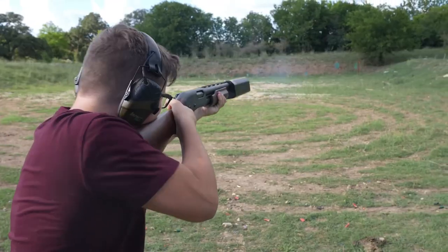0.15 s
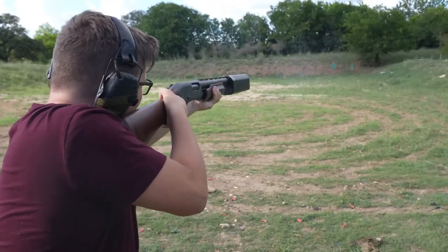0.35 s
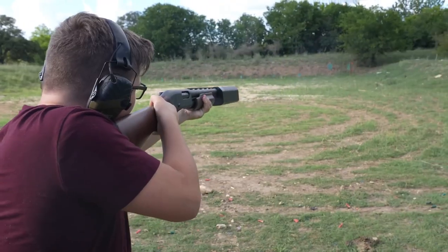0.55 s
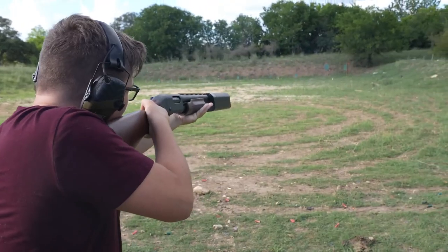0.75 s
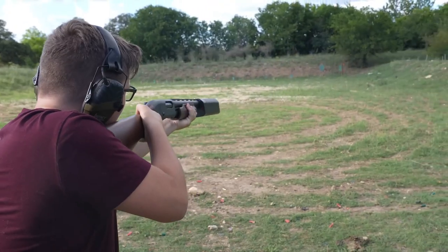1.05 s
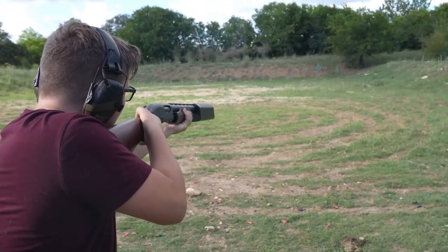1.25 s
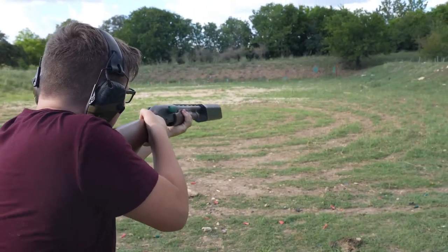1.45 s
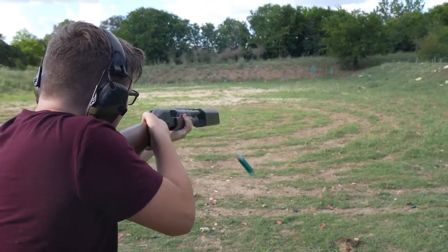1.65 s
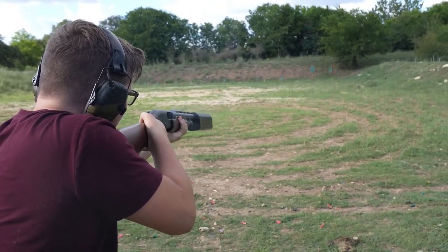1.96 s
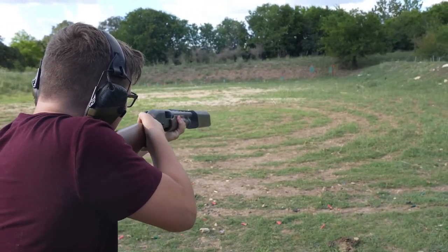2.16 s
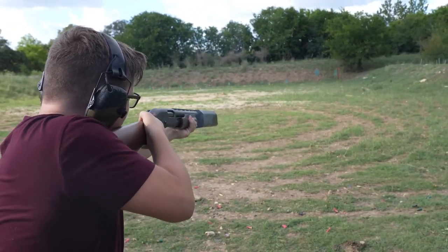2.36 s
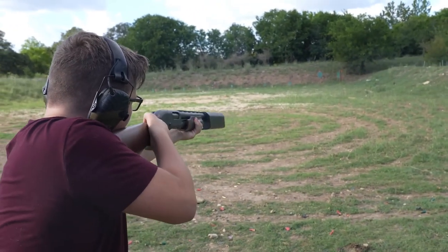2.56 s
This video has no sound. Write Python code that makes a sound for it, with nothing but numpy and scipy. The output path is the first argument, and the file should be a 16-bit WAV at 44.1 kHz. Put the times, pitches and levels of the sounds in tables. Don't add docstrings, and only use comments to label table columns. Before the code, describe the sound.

A muffled shotgun fires once outdoors, its crack slapping back from a bank and trees; then the pump clacks back, the shell rattles out, and the pump slams home, close in stereo over faint insects and light wind.

```python
import sys
import numpy as np
from scipy import signal
from scipy.fft import rfft, irfft, next_fast_len
from scipy.io import wavfile
from scipy.ndimage import uniform_filter1d, map_coordinates

SR = 44100
rng = np.random.default_rng(int(sys.argv[2]) if len(sys.argv) > 2 else 0)


def materialize(psi):
    bounded = np.clip(np.atleast_2d(psi).T, -1, 1)
    quanta = np.round(bounded * 32767).astype(np.int16)
    wavfile.write(sys.argv[1], SR, quanta)


def level_to_linear(level):
    exponent = np.asarray(level, float) / 20
    return 10 ** exponent


N = 119070


def unit(x):
    return x / np.sqrt(np.mean(x ** 2) + 1e-20)


def steady(x, span_s):
    power = (x ** 2).reshape(-1, N).mean(axis=0)
    return x / np.sqrt(abs(uniform_filter1d(power, size=round(span_s * SR))) + .02)


def along(points, hz):
    f, v = np.transpose(points)
    return np.interp(np.log(hz + 1), np.log(f + 1), v)


def wobble(rate):
    knots = rng.standard_normal(int(N * rate / SR) + 4)
    return map_coordinates(knots, [np.arange(N) * rate / SR])


def filtered(x, response):
    m = next_fast_len(x.shape[-1] + 4096)
    return irfft(rfft(x, m) * response(np.fft.rfftfreq(m, 1 / SR)), m)[..., :x.shape[-1]]


def pair(alike, size, lag_s=0):
    def share(hz):
        turn = np.arccos(np.clip(along(alike, hz), -1, 1)) / 2
        return np.array([np.cos(turn), np.sin(turn)])

    def lag(hz):
        return np.exp(-1j * np.pi * hz * lag_s * np.array([[1], [-1]]))

    mid, side = filtered(rng.standard_normal((2, size)), share)
    return filtered(np.array([mid + side, mid - side]), lag)


def peak(hz, centre_hz, wide_hz):
    return 1j * hz * wide_hz / (centre_hz ** 2 - hz ** 2 + 1j * hz * wide_hz)


def resonant(hz, peaks):
    return 1 + sum((-1) ** k * level_to_linear(db) * peak(hz, c, w) for k, (c, w, db) in enumerate(peaks))


# pitch_hz, share (0 to 1)
PAN = [(250, 0), (500, 0.1), (1200, 0.78), (4000, 0.16), (9000, 0.95)]


def lean(x, pan_db):
    return filtered(x, lambda hz: level_to_linear(pan_db * along(PAN, hz) * np.array([[.5], [-.5]])))


# pitch_hz, level_db (per Hz)
ACTION = [(150, -22.5), (300, -11.5), (500, -11.5), (800, -8.5), (2000, -3), (5000, -2), (15600, -7),
          (16300, -52)]


def clicks(rows, body, broad_db=0, ring_db=9):
    rise_s, ring_q, broad_q, level_db = 0.0006, 12, .33, -1.5
    out, t = np.zeros((2, N + 4096)), np.arange(3000) / SR
    for s, db, hz, t60 in rows:
        decay = (1 - np.exp(-t / rise_s)) * level_to_linear(-60 * t / max(t60, .003))
        burr = pair([(500, 1.0), (2500, 0.67)], size=len(t)) * decay
        burr[:, round(rise_s * SR)] += 1.1
        stock_db = -6 + .5 * (db + 11.0)

        def struck(f):
            wide = peak(f, hz, hz / broad_q) ** 2 + level_to_linear(stock_db) * resonant(f, body)
            narrow = peak(f, hz, hz / ring_q)
            return level_to_linear(along(ACTION, f)) * (level_to_linear(broad_db) * wide + level_to_linear(ring_db) * narrow)

        ring = filtered(burr, struck)
        loudest = abs(ring.mean(axis=0)).max() * np.sqrt(2)
        out[:, round(s * SR):][:, :len(t)] += level_to_linear(db + level_db) * ring / loudest
    return out[:, :N]


# pitch_hz, level_db (per Hz)
AIR = [(180, -9), (400, -35), (1500, -18), (2300, -6), (8900, -12), (11700, -13.5), (12300, -53)]


def air():
    def colour(hz):
        return level_to_linear(along(AIR, hz)) * (abs(hz - 10580) > 840)

    return level_to_linear(-67) * unit(filtered(pair([(400, 0.16), (2000, 0.022)], size=N), colour))


def insects():
    song = filtered(pair([(1000, 0.17)], size=N), lambda hz: np.exp(-.5 * ((hz - 10580) / 420) ** 2))
    return level_to_linear(-63.5 + 1.8 * wobble(39.9)) * unit(song)


# pitch_hz, level_db (per Hz)
RUMBLE = [(20, -8), (50, 7.5), (100, -1.5), (200, -26), (400, -24), (800, -73)]
# middle_s, level_db (over the steady wind), spread_s
GUSTS = [(.05, -4.5, 0.098), (0.171, 10, 0.035), (.4, 9, 0.078), (.75, 6, 0.018), (.9, 7, 0.042),
         (1.11, 7.5, 0.025), (1.21, 10, 0.013), (1.7, -16, 0.048), (1.902, 8.5, 0.023), (2.039, 2, 0.018),
         (2.112, 13, 0.0096), (2.178, 13, 0.027), (2.619, 10, 0.02)]


def wind():
    t, wind_db = np.arange(N) / SR, -65.5
    swell_db = sum(db * np.exp(-.5 * ((t - s) / spread) ** 2) for s, db, spread in GUSTS)
    rumble = level_to_linear(2.5 * wobble(40)) * pair([(60, .96)], size=N)
    rumble = steady(unit(filtered(rumble, lambda hz: level_to_linear(along(RUMBLE, hz)))), .05)
    flutter = level_to_linear(4 * wobble(50)) * rng.standard_normal(N)
    flutter = steady(unit(filtered(flutter, lambda hz: peak(hz, 158, 316) ** 4)), .06)
    return level_to_linear(wind_db + swell_db) * (rumble + level_to_linear(-16.5 + 0.46 * swell_db) * flutter)


# middle_s, level_db, spread_s,
# centre_hz, left_over_right_db
ECHOES = [(0.227, -30.5, 0.0047, 270, -2), (0.231, -31, 0.0024, 11000, -25),
          (.258, -28.5, 0.018, 11100, -8), (0.294, -34.5, 0.015, 640, 1), (.29, -30.5, 0.019, 9700, 17.5),
          (0.324, -22.5, 0.0099, 6560, -10), (0.349, -32, 0.043, 290, -17.5),
          (0.382, -26.5, 0.044, 4300, 0), (0.459, -28, 0.039, 1960, -19.5), (.52, -37, 0.039, 258, -2),
          (.655, -45.5, 0.03, 260, -6), (0.556, -32.5, 0.007, 1130, -3), (0.612, -33, 0.01, 6500, -6),
          (0.637, -32, 0.024, 1130, -4), (0.673, -34, 0.015, 1430, -8), (0.76, -38.5, 0.022, 1380, -4.5),
          (0.878, -49.5, 0.025, 1160, 0), (1.008, -51, 0.014, 880, -4), (1.679, -60, 0.1, 490, -5),
          (1.8, -68, 0.1, 970, -6)]
# pitch_hz, fall_s
TAIL = [(250, .55), (480, 1.3), (900, 2.76), (2500, 1.69), (6000, 1.47), (12000, 0.77), (15000, 1)]
# pitch_hz, level_db (per Hz)
BLAST = [(100, -19), (250, -5), (480, -17.5), (700, -12), (2600, 6.5), (10400, 2.5), (15600, -5.5),
         (16200, -46)]
# pitch_hz, width_hz, level_db
MUFFLER = [(705, 91, 13), (1380, 240, 4.5), (1830, 480, -11.5)]
# pitch_hz, likeness (0 to 1)
ECHO_ALIKE = [(300, 1), (700, 0.92), (1500, 0.89), (3000, 0.31), (8000, 0.034)]


def echoes():
    shot_s, tail_db, rise_s, octaves, skirt_db = SHOT[0][0], -22.5, 0.25, 0.92, -17.5
    valley_db, valley_t60, valley_hz = -61, 6.7, 810
    noise = level_to_linear(0.41 * wobble(150)) * pair(ECHO_ALIKE, size=N, lag_s=0.00011)
    hz, t, z = signal.stft(noise, SR, nperseg=512, noverlap=448)
    hz = hz[:, None]
    since = np.clip(t - shot_s, 0, None)
    colour = abs(level_to_linear(along(BLAST, hz)) * resonant(hz + 1, MUFFLER)) ** 2

    def side(pan_db):
        return level_to_linear(pan_db * along(PAN, hz) * np.array([1, -1])[:, None, None])

    def near_pitch(centre_hz, width):
        return np.exp(-(np.log2((hz + 1) / centre_hz) / width) ** 2)

    fall = (1 - np.exp(-since / rise_s)) * level_to_linear(-120 * since / along(TAIL, hz))
    power = level_to_linear(2 * tail_db) * colour / colour.mean() * fall
    valley = level_to_linear(2 * valley_db - 120 * since / valley_t60) * 20 * near_pitch(valley_hz, 0.34)
    power = (power + valley * (since > 0)) * side(-6)
    for s, db, spread, centre_hz, pan_db in ECHOES:
        tint = colour * (near_pitch(centre_hz, octaves) + level_to_linear(2 * skirt_db))
        swell = np.exp(-.5 * ((t - s) / spread) ** 2) * (since > 0)
        power += side(pan_db) * level_to_linear(2 * db) * tint / tint.mean() * swell
    patches = uniform_filter1d(rng.standard_normal(power.shape[1:]), size=5, axis=0)
    patches = unit(uniform_filter1d(patches, size=12, axis=1))
    roar = signal.istft(z * np.sqrt(power) * level_to_linear(2 * patches), SR, nperseg=512, noverlap=448)[1][:, :N]
    return roar * (np.arange(N) > shot_s * SR)


# start_s, level_db (peak), pitch_hz, fall_s (to -60 dB)
BANK = [
    (.409, -28, 2570, .03),
    (.431, -25, 2140, 0.035),
    (.445, -16, 1660, 0.029),
    (.453, -22.5, 688, 0.046),
    (.462, -20, 2160, .03),
    (.475, -18, 1580, 0.025),
    (.483, -21, 2680, .03),
    (.5132, -31.5, 2270, 0.019),
]
# start_s, level_db (peak), pitch_hz, fall_s (to -60 dB)
TREES = [
    (.286, -25.5, 743, 0.063),
    (.551, -17.5, 1170, 0.028),
    (.612, -19.5, 1140, 0.017),
    (.625, -18, 805, 0.023),
    (.634, -16.5, 1200, 0.045),
    (.651, -24, 870, 0.023),
    (.687, -41, 1120, 0.05),
    (.747, -32, 2060, 0.045),
    (.768, -31, 1130, 0.036),
]


def faces():
    bank, trees = clicks(BANK, [], broad_db=-18), clicks(TREES, [], broad_db=-18)
    return lean(bank, -26) + lean(trees, -9)


# start_s, level_db
TUBE = [
    (1.57, -56),
    (2.478, -52),
]


def tube():
    t, pitch_hz, t60 = np.arange(N) / SR, 895, .19
    return sum((t > s) * level_to_linear(db - 60 * abs(t - s) / t60) * np.sin(2 * np.pi * pitch_hz * (t - s))
               for s, db in TUBE)


# start_s, end_s, level_db
SLIDES = [
    (1.483, 1.526, -44),
    (1.56, 1.61, -40),
    (1.614, 1.657, -50),
    (1.78, 1.83, -58.5),
    (2.31, 2.395, -41.5),
    (2.402, 2.469, -39.5),
]


def slides():
    t, edge_s = np.arange(N) / SR, .012
    stroke = sum(level_to_linear(db) * np.clip(np.minimum(t - a, b - t) / edge_s + .5, 0, 1) ** 2 for a, b, db in SLIDES)
    grit = level_to_linear(3.5 * wobble(500)) * pair([(500, .97), (2500, .7)], size=N)
    return stroke * unit(filtered(grit, lambda hz: level_to_linear(along(ACTION, hz))))


def space(x):
    t = np.arange(SR) / SR
    near = level_to_linear(-60 * t / .1) * rng.standard_normal((2, len(t)))
    far = (t > .07) * level_to_linear(-60 * t / .8) * rng.standard_normal((2, len(t)))
    far = filtered(far, lambda hz: peak(hz, 6500, 13000) / (1 + (hz / 13000) ** 10))
    low = level_to_linear(-60 * t / .4) * pair([(500, 1.0)], size=len(t))
    low = filtered(low, lambda hz: peak(hz, 800, 800) ** 2)
    tail = sum(level_to_linear(db) * part / np.linalg.norm(part[0]) for db, part in [(-12, near), (-26, far), (-32, low)])
    return signal.fftconvolve(x, tail, axes=1)[:, :N]


# start_s, level_db (peak), pitch_hz
TICKS = [(0.8496, -32, 2700), (0.9651, -25, 4560), (0.9765, -24.5, 4200), (1.0331, -37, 6400),
         (1.1462, -37.5, 2660), (1.1741, -29, 6500), (1.1779, -31.5, 2920), (1.1966, -39, 5830),
         (1.3708, -40, 3430), (1.4328, -35, 2560), (1.622, -35, 4000), (1.6365, -29, 4570),
         (1.6437, -25.5, 3560), (1.6964, -24.5, 7050), (1.715, -30.5, 5340), (1.7722, -37, 3800),
         (1.775, -27, 5250), (1.81, -37, 5550), (1.8283, -35, 4580), (2.126, -38, 9500)]
# start_s, level_db (peak), pitch_hz, fall_s (to -60 dB)
BACK = [(1.4694, -25.5, 1810, 0.03), (1.476, -22.5, 4040, 0.046), (1.4803, -25, 7500, 0.015),
        (1.4854, -21, 10700, 0.0096), (1.5, -19.5, 2740, 0.025), (1.5062, -28, 3800, 0.11),
        (1.5168, -28.5, 10300, 0.017), (1.5239, -15.5, 1880, 0.063), (1.5281, -10.5, 4530, 0.04),
        (1.5334, -10.5, 14800, 0.043), (1.5431, -8, 2670, 0.013), (1.5443, -8, 3980, 0.0098),
        (1.549, -7.5, 4400, 0.058), (1.554, -17.5, 4080, 0.09), (1.5608, -6.5, 6160, 0.011),
        (1.5654, -13, 4280, 0.014), (1.5698, -4.5, 5600, 0.013), (1.5745, -26, 4200, 0.053),
        (1.589, -20.5, 4240, 0.016), (1.5965, -28.5, 1840, 0.029)]
# start_s, level_db (peak), pitch_hz, fall_s (to -60 dB)
HOME = [(2.2563, -29.5, 3500, 0.016), (2.2764, -22.5, 4770, 0.046), (2.2837, -20, 4760, 0.041),
        (2.2974, -18.5, 5770, 0.032), (2.3162, -14, 4800, 0.075), (2.3226, -14, 4700, 0.025),
        (2.335, -16, 8500, 0.0068), (2.3436, -13, 5330, 0.013), (2.3459, -16.5, 5550, 0.02),
        (2.3634, -18.5, 2560, 0.023), (2.3689, -14, 1880, 0.045), (2.3795, -17, 7500, 0.012),
        (2.389, -12.5, 1950, 0.036), (2.4034, -18.5, 2120, 0.043), (2.4127, -6, 9000, .02),
        (2.4142, -6, 3020, 0.013), (2.4178, -8.5, 2390, 0.021), (2.424, -4.5, 5680, 0.023),
        (2.4295, -18, 4700, 0.025), (2.4445, -29, 6260, 0.022)]
# start_s, level_db (peak), pitch_hz, fall_s (to -60 dB)
KNOCKS = [(1.4586, -31, 2570, .015), (.9655, -27, 4500, .03), (1.1745, -40, 1500, .02),
          (1.5005, -30, 850, .03), (1.5435, -19, 1100, .04), (1.5625, -21, 1150, .04),
          (2.413, -17, 1450, .03), (1.6362, -30, 2200, .012), (1.6437, -28, 2250, .012),
          (1.7051, -33, 1860, .03), (1.77, -41, 1900, .02), (1.7755, -38, 2000, .015),
          (1.805, -45, 2000, .02), (1.8078, -35, 1950, .015), (1.815, -40, 1900, .03),
          (1.827, -42, 2000, .04), (2.1255, -41, 1250, .03), (2.4768, -29, 1200, .02)]
# pitch_hz, width_hz, level_db
BODY = [(756, 83, 14), (1226, 49, 5.5), (1880, 160, 5), (4300, 130, -18), (14800, 240, -10)]


def pump():
    ticks = [(s, db, hz, .012) for s, db, hz in TICKS]
    metal = clicks([*ticks, *BACK, *HOME], BODY)
    dull = clicks(KNOCKS, [], broad_db=-13)
    clatter = metal + dull + slides()
    return lean(clatter + space(clatter), -3.5)


# start_s, level_db (peak), pitch_hz, fall_s (to -60 dB)
SHOT = [
    (.2222, -12, 7700, .012),
    (.2272, -7, 3500, .01),
    (.2285, -12, 10400, .03),
]
# start_s, level_db (peak), pitch_hz, fall_s (to -60 dB)
SLAP = [
    (.5142, -9, 2100, .006),
]


def shot():
    cracks = clicks(SHOT, [], ring_db=-16)
    slap = clicks(SLAP, [], broad_db=-11.5)
    return lean(cracks + slap, -6)


def scene():
    background = air() + insects() + wind()
    answer = echoes() + faces()
    return background + answer + tube() + pump() + shot()


def roll_off(x):
    return signal.sosfilt(signal.butter(12, 17000, fs=SR, output="sos"), x)


def record(dry):
    mix = filtered(dry, lambda hz: hz < 17000)
    return roll_off(mix)


dry = scene()
out = record(dry)
materialize(out)
```